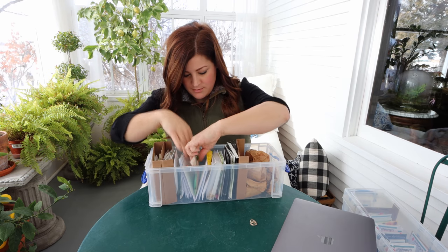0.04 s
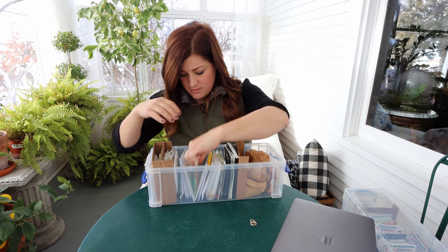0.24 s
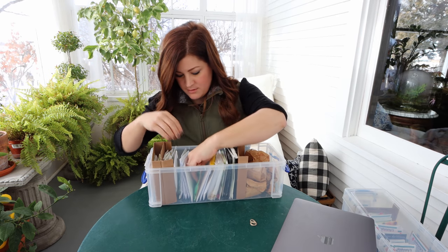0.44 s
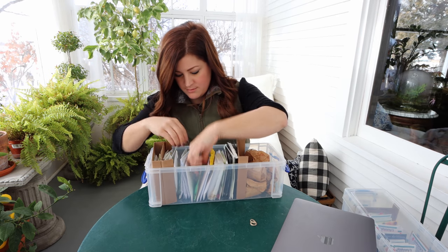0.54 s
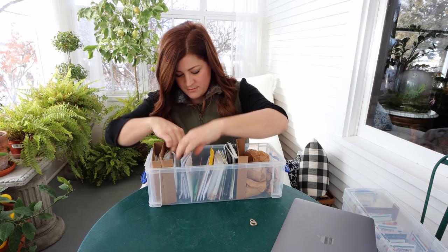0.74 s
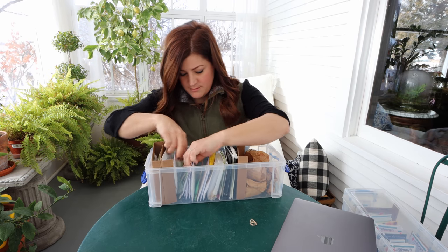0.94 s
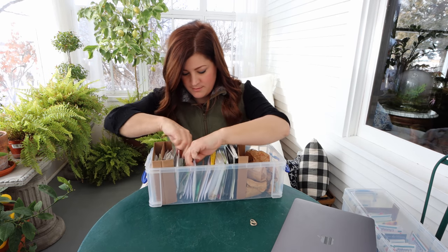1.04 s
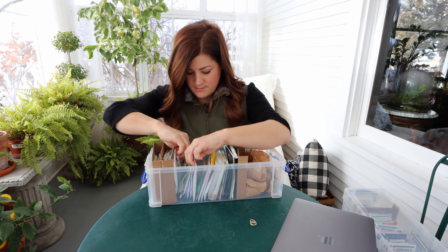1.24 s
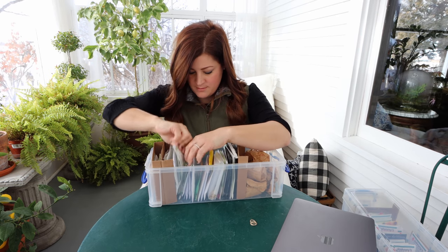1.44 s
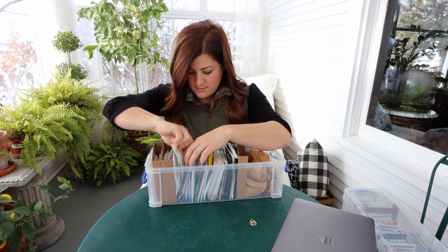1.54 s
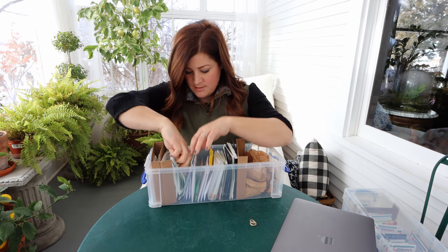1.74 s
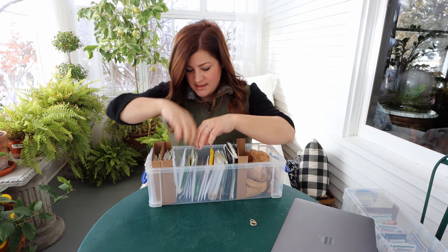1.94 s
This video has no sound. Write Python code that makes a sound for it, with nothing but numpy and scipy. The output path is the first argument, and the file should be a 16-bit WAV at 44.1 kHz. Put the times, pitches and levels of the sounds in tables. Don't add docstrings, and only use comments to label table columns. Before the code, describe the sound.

Hands shuffle paper seed packets in a plastic storage box, short crackling slides with bright crease ticks and dull hollow knocks throughout, heard close to a camera microphone in a small quiet room with faint hum.

```python
import sys
import numpy as np
from scipy import signal
from scipy.fft import rfft, irfft
from scipy.io import wavfile

SR = 44100
rng = np.random.default_rng(int(sys.argv[2]) if len(sys.argv) > 2 else 0)


def dump_mix(stems):
    frames = np.atleast_2d(stems).T
    limited = np.clip(frames, -1, 1)
    pcm = np.round(limited * 32767).astype(np.int16)
    wavfile.write(sys.argv[1], SR, pcm)


def to_linear_factor(level_db):
    exponent = np.asarray(level_db, float) / 20
    return 10 ** exponent


N = 88200

# start_s, length_s, paper_db, treble_db (over paper), box_db
STROKES = [(-.03, 0.13, -49.5, -2, -47), (0.05, 0.022, -43.5, -11, -42), (0.112, 0.028, -51.5, -7, -55),
           (0.18, 0.18, -61.5, 5.5, -50), (0.263, 0.15, -49, 0.5, -43.5), (0.302, 0.089, -39, -6.5, -37.5),
           (0.393, 0.15, -53.5, -29, -48.5), (0.53, 0.045, -43, -3.5, -45.5), (0.576, 0.042, -57, 7, -49),
           (0.67, 0.096, -58, 4, -50), (0.73, 0.14, -48.5, -16, -47), (0.798, 0.086, -44.5, 0, -37.5),
           (0.889, 0.11, -49, -2.5, -43.5), (1.02, 0.072, -58.5, 2, -48.5), (1.064, 0.14, -46, -7.5, -46),
           (1.248, 0.14, -46, -4.5, -41), (1.353, 0.07, -50, 1.5, -65), (1.399, 0.13, -42.5, 2, -45.5),
           (1.517, 0.059, -54.5, 3.5, -38), (1.57, 0.14, -45.5, 1, -41.5), (1.715, 0.063, -43.5, 1, -36.5),
           (1.823, 0.13, -50.5, -15, -54), (1.835, 0.099, -48.5, -4, -50), (1.976, .05, -50, -3, -43)]
# pitch_hz, width_hz, level_db
BOX = [(160, 21, -24), (338, 142, -2.5), (397, 112, 2), (537, 128, -3), (755, 52, -8), (1190, 460, -19)]
TABLE_HZ, TABLE_WIDTH_HZ = 106, 222
SNAP_LAG_S = 0.0007


def reson(x, hz, width_hz):
    return signal.lfilter(*signal.iirpeak(min(hz, 0.45 * SR), max(hz / width_hz, 0.3), fs=SR), x)


def twice(x, hz, width_hz):
    return reson(reson(x, hz, width_hz), hz, width_hz)


def body(x, peaks):
    return sum((-1) ** k * to_linear_factor(db) * reson(x, hz, width) for k, (hz, width, db) in enumerate(peaks))


def unit(x):
    return x / np.sqrt(np.mean(x ** 2))


def peak(x):
    return x / np.abs(x).max()


def grains(per_s, spread_db):
    on = rng.random(N) < per_s / SR
    size = np.minimum(rng.exponential(size=N), 3.5)
    return on * rng.standard_normal(N) * to_linear_factor(spread_db * size)


def walk(rate_hz):
    w = 2 * np.pi * rate_hz / SR
    two_poles = np.convolve([1, w - 1], [1, w - 1])
    return unit(signal.lfilter([w * w], two_poles, rng.standard_normal(N)))


def add(out, at_s, x):
    i = int(at_s * SR)
    out[i:i + len(x)] += x[:max(N - i, 0)]


def room_tone():
    # pitch_hz, level_db
    spectrum = [(15, -14), (25, 10.5), (326, -12), (962, -6.5), (2410, -9.5), (4250, -26), (5730, -22),
                (14800, -22.5), (16000, -32)]
    tint_hz, tint_db = np.array(spectrum).T
    hz = np.maximum(np.arange(N // 2 + 1) * SR / N, 10)
    tint = to_linear_factor(np.interp(np.log(hz), np.log(tint_hz), tint_db))
    return to_linear_factor(-56.5) * unit(irfft(rfft(rng.standard_normal(N)) * tint, N))


def echo(x):
    level_db, t60_s, dull_hz, gap_s = -22, 0.1, 4000, 0.003
    t = np.arange(SR // 4) / SR
    tail = rng.standard_normal(len(t)) * np.exp(-np.log(1000) * t / t60_s) * (t > gap_s)
    tail = signal.lfilter(*signal.butter(1, dull_hz, fs=SR), tail)
    return to_linear_factor(level_db) * signal.fftconvolve(x, tail / np.sqrt(np.sum(tail ** 2)))[:N]


def scrapes():
    # start_s, length_s, level_db, start_hz, end_hz
    drags = [
        (0.351, 0.047, -40, 3500, 3420),
        (1.298, 0.09, -42, 2490, 2140),
        (1.513, 0.089, -37.5, 647, 700),
    ]
    q = 6.9
    out = np.zeros(N)
    for at, length, db, start_hz, end_hz in drags:
        u = np.linspace(0, 1, int(length * SR))
        grit = grains(3000, 0.8)[:len(u)]
        x = (1 - u) * reson(grit, start_hz, start_hz / q) + u * reson(grit, end_hz, end_hz / q)
        swell = np.sqrt(np.sin(np.pi * u ** 0.25).clip(0))
        add(out, at, to_linear_factor(db) * unit(x) * swell)
    return out


def rings():
    # start_s, peak_db, pitch_hz
    corners = [(0.261, -36, 3970), (.419, -26, 7900), (0.5403, -25.5, 4060), (0.9233, -26.5, 3920),
               (1.1296, -25, 13000), (1.2902, -20.5, 6260), (1.2897, -24.5, 3330), (1.6813, -28.5, 7500),
               (1.91, -21, 5550), (1.909, -23, 2820), (0.7537, -30, 900), (0.8997, -37.5, 1300)]
    q, decay_s = 4.2, 0.0011
    out = np.zeros(N)
    shape = np.exp(-np.arange(1024) / SR / decay_s)
    for at, db, hz in corners:
        burst = rng.standard_normal(1024) * shape
        add(out, at + SNAP_LAG_S, to_linear_factor(db) * peak(twice(burst, hz, hz / q)))
    return out


def knocks():
    # start_s, peak_db, pitch_hz, table_db (thud share)
    hits = [(0.029, -45, 460, -8), (0.061, -34, 520, 2.5), (0.204, -27, 427, 1.5), (0.262, -34.5, 500, -12),
            (0.339, -14.5, 452, -20), (0.372, -27.5, 388, -28), (0.391, -24, 540, -11.5),
            (0.405, -26.5, 429, -3.5), (0.57, -30.5, 400, -26), (0.614, -39, 354, -26),
            (0.731, -31.5, 523, -11), (0.812, -34.5, 510, 1), (0.846, -29, 303, -3), (0.897, -25, 443, -15),
            (0.935, -28.5, 484, -25), (1.072, -36, 450, -7), (1.163, -29.5, 450, -17),
            (1.286, -31.5, 435, -14), (1.4275, -25, 321, -5), (1.445, -25.5, 477, -5),
            (1.476, -26, 440, -8), (1.5042, -9, 483, -25), (1.632, -31.5, 476, -4),
            (1.654, -30.5, 450, -18), (1.7, -30, 316, -17), (1.745, -27, 364, -8), (1.863, -28, 377, -6),
            (1.884, -29, 452, -1.5), (1.976, -29, 524, -6), (1.991, -24, 305, -27),
            (1.992, -16.5, 580, -25), (1.506, -22.5, 316, -21), (1.4285, -26.5, 560, -17),
            (0.848, -36, 554, -20), (1.742, -31.5, 565, -25), (0.44, -37.5, 344, -19)]
    # start_s, peak_db, pitch_hz, table_db (thud share)
    soft_knocks = [(0.113, -49, 393, -19), (0.537, -41, 600, -18), (0.688, -44, 338, -16),
                   (0.782, -42, 430, -16), (0.87, -38, 516, -12), (0.919, -28.5, 433, -17),
                   (0.971, -38.5, 470, -6), (0.99, -39, 452, -14), (1.036, -42.5, 510, -14), (1.1, -40, 430, -9),
                   (1.129, -33.5, 624, -12), (1.147, -46, 463, -20), (1.265, -40, 436, -12),
                   (1.314, -43, 427, -12), (1.356, -41.5, 290, -2), (1.53, -37, 530, -16), (1.56, -31, 503, -14),
                   (1.596, -40, 358, -14), (1.611, -40, 498, -16), (1.642, -32, 472, -9), (1.724, -39, 365, -20),
                   (1.761, -31.5, 374, -3), (1.774, -36.5, 263, -11), (1.789, -44, 500, -14)]
    knock_lag_s, soft_lead_s, push_s = 0.002715, 0.00202, 0.00095
    rows = [*hits, *((at - soft_lead_s, *rest) for at, *rest in soft_knocks)]
    out, t = np.zeros(N), np.arange(4096) / SR
    push = np.sin(np.pi * np.clip(t / push_s, 0, 1)) ** 2
    thud = peak(twice(push, TABLE_HZ, TABLE_WIDTH_HZ))
    edge = to_linear_factor(-16) * peak(twice(np.gradient(push), 1090, 370))
    wall_band = signal.butter(2, [214, 1100], "band", fs=SR)
    for at, db, hz, table_db in rows:
        detune = 1 + 0.06 * rng.standard_normal(len(BOX))
        walls = sum(to_linear_factor(g) * reson(push, f * d, width) for (f, width, g), d in zip(BOX, detune))
        ring = peak(reson(reson(push, hz, hz / 4.55), hz, hz / 1.45))
        x = ring + to_linear_factor(-9.5) * peak(signal.lfilter(*wall_band, walls))
        add(out, at + knock_lag_s, to_linear_factor(db) * (peak(x) - to_linear_factor(table_db) * thud + edge))
    return out


def ticks():
    # start_s, peak_db, pitch_hz (strongest ring), sheet_db (share), treble_db (share)
    creases = [(0.0621, -32, 1550, -14, -14), (0.263, -36, 1480, -40, -40), (0.32, -28, 1630, 3.5, -10),
               (0.3455, -24.5, 1490, 5.5, 5.5), (0.389, -26, 1960, -26, -36),
               (0.419, -13, 3430, -17, -11.5), (0.5395, -21.5, 1640, -2.5, -12),
               (0.5604, -28.5, 1510, -11, -23), (0.5745, -22.5, 1480, -24, -17),
               (0.7528, -15, 1800, -22, -20), (0.845, -24, 1850, -5.5, -3),
               (0.9234, -22.5, 1800, -6.5, -20), (0.9927, -25.5, 1700, -15, -11),
               (1.1017, -28.5, 1670, 0.5, -14), (1.1295, -17, 6600, 3.5, -1.5),
               (1.1652, -28.5, 1410, -1, -8), (1.2893, -14, 1970, -2, 3.5), (1.3571, -27, 1950, -18, -18),
               (1.4297, -29.5, 1680, -15, -6), (1.485, -32, 1800, 1, 14.5), (1.6433, -21.5, 5150, -0.5, -6),
               (1.6809, -27, 4250, -4, -2), (1.7454, -29, 2070, -0.5, -10), (1.7727, -20, 1730, -18, -33),
               (1.8647, -25.5, 1950, -4, -15), (1.8766, -21, 4800, -0.5, -5),
               (1.91, -18.5, 1520, -10, -0.5), (1.979, -32.5, 1680, -20, -8)]
    # start_s, peak_db, pitch_hz (strongest ring), treble_db (share, also of the sheet)
    faint = [(0.0785, -32, 1350, 2), (0.1503, -37.5, 1320, -4), (0.2752, -39, 1350, -21),
             (0.618, -35, 1600, -5), (0.716, -40.5, 3500, -12), (0.8783, -34, 1320, -14),
             (0.937, -26.5, 1800, -37), (1.01, -32, 1610, -17), (1.1169, -25.5, 1380, -21),
             (1.1936, -36, 1870, -23), (1.284, -29, 2800, -23), (1.4505, -26.5, 9300, -8),
             (1.5348, -31.5, 3340, -26), (1.689, -33, 3330, -18), (1.705, -30, 1290, -16),
             (1.8364, -38.5, 4170, -18), (1.888, -34, 1540, -11), (0.2866, -37, 2050, -12),
             (.2977, -35, 3330, -8), (0.688, -47, 3760, -10), (0.697, -55, 1350, -8),
             (0.814, -40, 1650, -8), (0.9565, -39, 1600, -10), (1.3763, -37, 1800, -8),
             (1.6194, -33, 4450, -10), (1.9872, -34, 1380, -8), (1.996, -24.5, 1660, -25)]
    rows = [*creases, *((*row, row[-1]) for row in faint)]
    q, hold_s, decay_s = 2.4, 0.0006, 0.0011
    out, t = np.zeros(N), np.arange(1024) / SR
    crackle_shape = np.exp(-np.maximum(t - hold_s, 0) / decay_s)
    snap = to_linear_factor(10.5) * (np.arange(1024) == 8)
    for at, db, hz, sheet_db, treble_db in rows:
        burst = rng.standard_normal(1024) * crackle_shape + snap
        ring = to_linear_factor(7) * peak(twice(burst, hz, hz / q))
        fold = to_linear_factor(2.5) * peak(twice(burst, 2170, 2230))
        sheet = to_linear_factor(4) * peak(twice(burst, 3760, 5200))
        bright = to_linear_factor(-0.5) * peak(twice(burst, 8610, 6800))
        x = peak(ring + fold) + to_linear_factor(sheet_db) * sheet + to_linear_factor(treble_db) * bright
        add(out, at + SNAP_LAG_S, to_linear_factor(db) * x)
    return out


def strokes(gains_db, release_s):
    attack_s = 0.032
    t, power = np.arange(N) / SR, 0
    for (start, length, *_), db in zip(STROKES, gains_db):
        rise = np.clip((t - start) / attack_s, 0, 1)
        fall = np.exp(-np.maximum(t - start - length, 0) / release_s)
        power = power + (to_linear_factor(db) * rise * fall) ** 2
    return np.sqrt(power)


def patches(peaks, together_db):
    total = 0
    for hz, width, db in peaks:
        flicker = to_linear_factor(db + together_db + 4.14 * walk(50))
        total = total + flicker * reson(grains(14000, 2.5), hz, width)
    return unit(total)


def sliding():
    # pitch_hz, width_hz, level_db
    paper_low = [(1148, 380, -0.5), (1800, 470, 3.5), (3080, 1030, -3.5), (4370, 3480, -5.5)]
    # pitch_hz, width_hz, level_db
    paper_high = [(7100, 4800, -1.5), (9330, 5400, -7.5), (11800, 1100, -4), (16000, 1330, -22.5)]
    release_s, treble_release_s = 0.037, 0.008
    _, _, paper_db, treble_db, box_db = np.array(STROKES).T
    together_db = 0.54 * walk(47)
    low = patches(paper_low, together_db) * strokes(paper_db, release_s)
    high = to_linear_factor(-1.5) * patches(paper_high, together_db) * strokes(paper_db + treble_db, treble_release_s)
    bumps = grains(1100, 2.2) * to_linear_factor(0.96 * walk(12))
    box = unit(body(bumps, BOX))
    table = to_linear_factor(-5) * unit(twice(bumps, TABLE_HZ, TABLE_WIDTH_HZ))
    return low + high + (box + table) * strokes(box_db - 3, release_s)


def scene():
    near = scrapes() + rings() + knocks() + ticks() + sliding()
    near = signal.lfilter(*signal.butter(2, 141, "high", fs=SR), near)
    return (near + echo(near) + room_tone())[None]


def band_limit(x):
    return signal.sosfilt(signal.butter(12, 16540, fs=SR, output="sos"), x)


def record(dry):
    top_cut = signal.cheby1(10, 0.5, 15800, fs=SR, output="sos")
    return band_limit(signal.sosfilt(top_cut, dry))


dry = scene()
out = record(dry)
dump_mix(out)
```